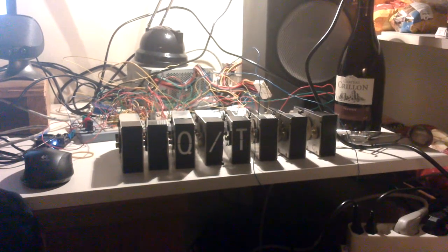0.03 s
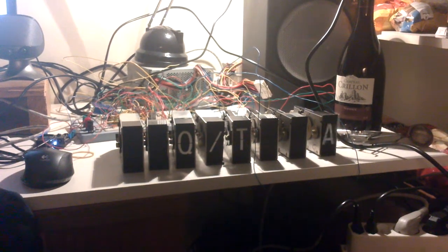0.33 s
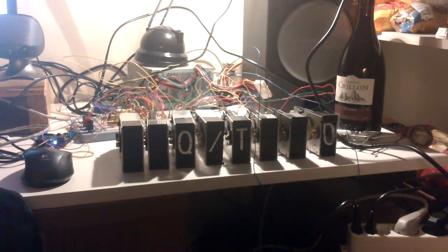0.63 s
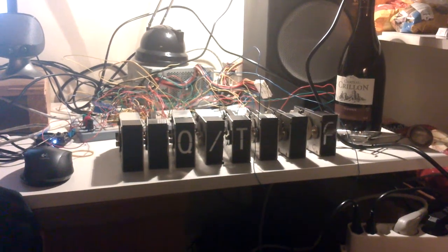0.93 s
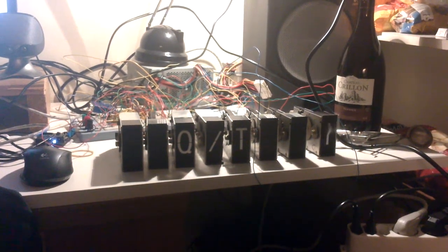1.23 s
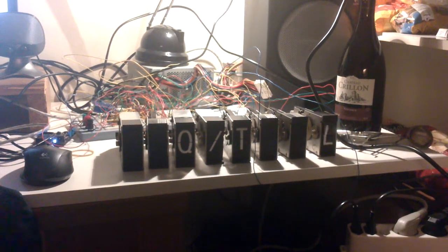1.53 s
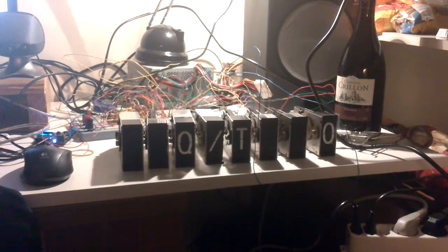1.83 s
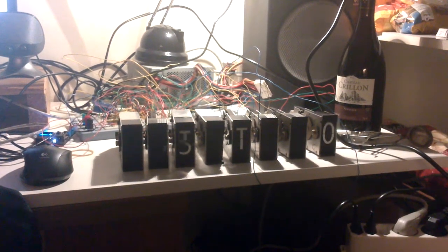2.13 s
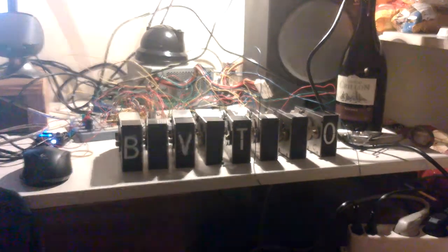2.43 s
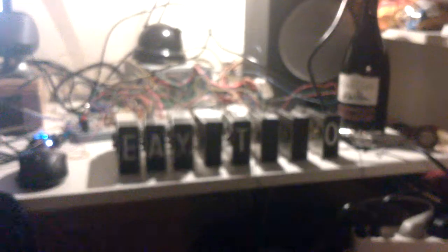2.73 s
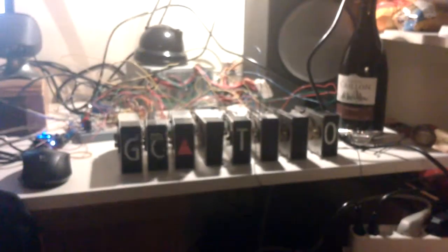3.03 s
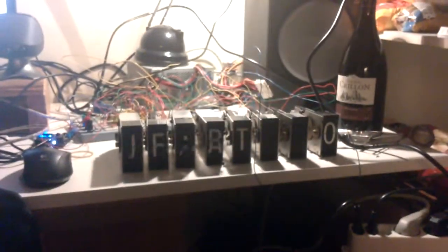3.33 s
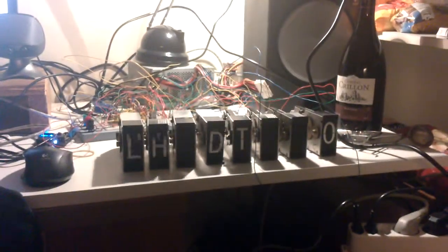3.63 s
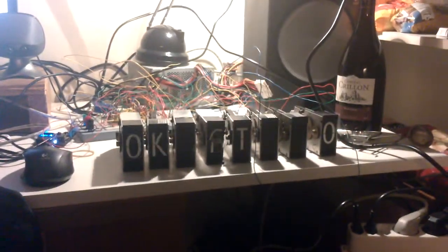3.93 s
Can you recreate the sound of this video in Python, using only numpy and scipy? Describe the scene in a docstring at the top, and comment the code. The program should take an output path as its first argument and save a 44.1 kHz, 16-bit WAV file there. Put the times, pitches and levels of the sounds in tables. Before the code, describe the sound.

Split-flap modules rattle on a desk in a quiet room, close to the microphone. One ticks rapidly alone, then several flip together in a fuller, slightly slower rhythm, with a few flaps snapping against the plastic cases.

```python
"""A desk in a small, quiet room: split-flap modules step through their letters, one alone, then four together.
Each step is a quickening train of frictional ratchet ticks that drives the resonances of the plastic case.
The force grows as the flap bends and dies as it slips free; the flap then patters down with a soft thud.
Now and then a flap catches and slaps. The room reverberates briefly after every step."""
import sys
import numpy as np
from scipy import signal
from scipy.fft import rfft, irfft
from scipy.io import wavfile
from scipy.ndimage import uniform_filter1d

SR = 44100
rng = np.random.default_rng(int(sys.argv[2]) if len(sys.argv) > 2 else 0)


def to_wav(sig):
    """Store sig (one row per channel, or 1-D mono) as 16-bit WAV at the path in sys.argv[1].

    Samples outside -1..1 are clipped; the rate is SR.
    """
    pcm = np.clip(np.atleast_2d(sig), -1, 1) * 32767
    pcm = np.round(pcm).astype(np.int16)
    wavfile.write(sys.argv[1], SR, pcm.T)  # frames by channels


N = 176400

# All levels in the tables are relative.
# spectrum of the room's background noise [f/Hz, level/dB]
BACKGROUND_SPECTRUM = [(12, 14.5), (30, -8), (48, -10.5), (75, -16), (140, -14), (300, -23), (1000, -30),
                       (4000, -45.5), (15000, -41.5)]
# steps of the lone module [t/s, ratchet level/dB, fall level/dB, bent flap's resonance f/Hz]
LONE_STEPS = [(-.058, 3.5, -55, 5800), (.05, -28.5, -59.5, 6050), (.157, -28.5, -53.5, 6080),
              (0.2702, -28, -57, 5640), (0.3762, -28, -58.5, 5600), (0.4854, -27.5, -63, 5850),
              (0.5913, -26.5, -59.5, 5300), (0.6974, -26.5, -62.5, 5220), (0.8052, -27.5, -59, 5350),
              (0.9126, -27, -63, 5380), (1.0215, -28, -61.5, 5580), (1.1337, -28, -55.5, 6000),
              (1.243, -28, -53, 5980), (1.3515, -28.5, -59, 5770), (1.455, -28.5, -57, 5720),
              (1.5612, -26.5, -67, 5600), (1.671, -26.5, -57.5, 5300), (1.7767, -26, -58, 5280)]
# steps of the group [t/s, ratchet level/dB, fall level/dB]
GROUP_STEPS = [(1.871, -27.5, -52.5), (1.99, -26, -51.5), (2.107, -27.5, -51), (2.229, -26, -52.5),
               (2.344, -26, -50.5), (2.463, -25.5, -52), (2.58, -25.5, -51.5), (2.7, -26.5, -52.5),
               (2.816, -26, -54), (2.934, -26.5, -52.5), (3.058, -26.5, -52.5), (3.175, -26.5, -50),
               (3.295, -26.5, -51.5), (3.411, -26.5, -50.5), (3.53, -26, -53), (3.646, -26, -52.5),
               (3.764, -26.5, -51), (3.884, -26, -51.5)]
# slaps of caught flaps [t/s, level/dB]
SLAPS = [(1.944, -35), (1.954, -31), (2.163, -29), (2.629, -35), (2.637, -33.5), (3.469, -31),
         (3.741, -35.5), (3.818, -27), (3.823, -34.5)]
# broad frequency response of the cases [f/Hz, level/dB]
LONE_CASE = [(500, -51.5), (1400, -84), (1850, -28), (2150, -35.5), (2450, -10), (2900, -21.5), (3600, -11),
             (4650, -16), (5050, -2), (6400, -4), (7200, -8), (10000, -4), (12500, -9.5), (14500, -5.5),
             (15700, -5)]
GROUP_CASE = [(400, -39), (1000, -31), (1650, -33), (2100, -11), (2500, -11.5), (2850, -17.5), (3600, -13),
              (4700, -9), (5300, -3.5), (6000, 0.5), (6600, 2.5), (7700, -5.5), (8700, 0), (11000, -6),
              (13000, -7.5), (15000, -5.5)]
# narrow modes of the cases [f/Hz, bandwidth/Hz, level/dB re the broad response]
LONE_MODES = [(1850, 130, 9), (3600, 400, -3), (5330, 60, -11), (5480, 70, -10), (5730, 70, -7),
              (12000, 100, -6), (14500, 90, -5)]
GROUP_MODES = [(6640, 200, -4), (7045, 50, -4), (7345, 40, -2), (8520, 45, -6), (13740, 100, -6),
               (14880, 70, -4), (15290, 50, -6)]
# spectra of the falling flaps [f/Hz, level/dB]
LONE_FALL_SPECTRUM = [(80, -14.5), (135, 5), (200, 0), (290, -2.5), (470, 0.5), (650, -8.5), (880, -3.5),
                      (1350, -18), (1820, -2.5), (2200, -7), (3500, 3), (7000, -3.5)]
GROUP_FALL_SPECTRUM = [(80, -8), (135, -9.5), (200, -0.5), (400, 1), (650, -3), (950, 1), (1600, -3),
                       (2400, 0), (4000, 6), (7000, -12.5)]
# microphone response, left minus right [f/Hz, level/dB]
MIC_BALANCE = [(1000, -0.5), (2500, 1.5), (3400, 0), (4400, -9), (5200, -10.5), (6600, -13), (8400, -8.5),
               (9800, -3.5), (11500, 9), (14000, 10)]
# force on a bending flap [peak t/s, starting level/dB, release rate/(dB/s)]
LONE_BEND = (0.026, -4, 760)
GROUP_BEND = (.023, -6, 560)

STEP_S = .1  # duration of one excitation
STEP_TIME = np.arange(int(STEP_S * SR)) / SR


def undb(db):
    """Amplitude ratio of a level in decibels."""
    return 10 ** (np.asarray(db) / 20)


def unit_energy(x):
    """Normalisation to an energy of 1."""
    return x / np.sqrt(np.sum(x ** 2))


def add(track, at, sound, db):
    """Superposition: mix in a sound with the energy of half a step at an RMS level of db."""
    start = int(at * SR)
    lo, hi = max(start, 0), min(start + len(sound), N)
    if hi > lo:
        track[lo:hi] += (unit_energy(sound) * np.sqrt(STEP_S * SR / 2) * undb(db))[lo - start:hi - start]


def gain_curve(points, size=8192):
    """Magnitude response through (f/Hz, level/dB) points, interpolated in log frequency."""
    hz, db = np.array(points, float).T
    return undb(np.interp(np.log(np.fft.rfftfreq(size, 1 / SR) + 1), np.log(hz), db))


def minimum_phase(gain):
    """Folding the cepstrum gives the most compact causal impulse response with these gains."""
    cepstrum = irfft(np.log(gain))
    half = len(cepstrum) // 2
    cepstrum[1:half] *= 2
    cepstrum[half + 1:] = 0
    return irfft(np.exp(rfft(cepstrum)))[:half]


def crossover(x, hz):
    """Power-complementary filtering: the parts below and above a frequency."""
    ratio = (np.fft.rfftfreq(x.shape[-1], 1 / SR) / hz) ** 2
    low = rfft(x) / np.hypot(1, ratio)
    return irfft(low, x.shape[-1]), irfft(low * ratio, x.shape[-1])


def whiten(response, bins=120):
    """Spectral whitening: the broad colour goes flat, the fine interference ripple stays."""
    power = uniform_filter1d(np.abs(rfft(response)) ** 2, bins)
    return signal.fftconvolve(response, minimum_phase(1 / np.sqrt(power)))[:len(response)]


def resonator(spectrum, modes=(), size=8192):
    """Modal superposition: impulse response of a broad spectrum with damped resonances on top."""
    f = np.fft.rfftfreq(size, 1 / SR)
    peaks = sum(undb(db) / (1 + 2j * (f - hz) / width) for hz, width, db in modes)
    return minimum_phase(gain_curve(spectrum) * np.abs(1 + peaks))


def background(db=-56, side_db=-4):
    """Stationary noise: the room's faint rumble and hiss, partly coherent between left and right."""
    colour = unit_energy(resonator(BACKGROUND_SPECTRUM))
    mid, side = (signal.fftconvolve(rng.standard_normal(N), colour)[:N] for _ in range(2))
    return undb(db) * (mid + undb(side_db) * side * np.array([[1], [-1]]))


def room(x, tail_db=-1, desk_db=5):
    """Reverberation: direct sound, early reflections off the cluttered desk and an exponential tail."""
    desk_t60_s, tail_t60_s, treble_t60_s = .011, .18, .17
    tail_delay_s, bass_hz, treble_hz = .0062, 844, 7560
    t = np.arange(SR // 2) / SR

    def diffuse_field(t60_s):
        """Decaying noise in which only the long waves are alike at both sides."""
        coherent = rng.standard_normal(len(t)) + undb(-5) * rng.standard_normal((2, len(t)))
        bass, _ = crossover(coherent, bass_hz)
        _, upper = crossover(rng.standard_normal((2, len(t))), bass_hz)
        return (bass + upper) * np.exp(-np.log(1000) * t / t60_s)

    desks = diffuse_field(desk_t60_s)
    low_tails, _ = crossover(diffuse_field(tail_t60_s), treble_hz)
    _, high_tails = crossover(diffuse_field(treble_t60_s), treble_hz)
    tails = (low_tails + high_tails) * (t > tail_delay_s) * (t < .49)  # the window ends in silence
    responses = [(t == 0) + undb(desk_db) * unit_energy(desk) + undb(tail_db) * unit_energy(tail)
                 for desk, tail in zip(desks, tails)]
    return np.array([signal.oaconvolve(x, whiten(response))[:N] for response in responses])


def falling_flaps(steps, spectrum, gain_db):
    """Impact noise: each freed flap patters onto the stack and the desk answers with a soft thud."""
    peak_s, rise_s, decay_s, grit = .048, .008, .02, .6
    thud_hz, thud_lag_s = 277, .01193
    out, ring, t = np.zeros(N), resonator(spectrum), STEP_TIME
    swell = np.where(t < peak_s, np.exp((t - peak_s) / rise_s), np.exp((peak_s - t) / decay_s))
    for at, _, fall_db, *_ in steps:
        noise = rng.standard_normal(len(t))
        roughness = np.exp(grit * np.clip(rng.standard_normal(len(t)), -2, 2))
        add(out, at, signal.fftconvolve(swell * noise * roughness, ring), fall_db + gain_db)
    thud, patter = crossover(out, thud_hz)
    return patter + np.roll(thud, int(thud_lag_s * SR))


def slaps(decay_s=.0018, gain_db=-4.5):
    """Impulsive excitation: a caught flap snaps against the case, which rings freely."""
    out, case = np.zeros(N), resonator(GROUP_CASE, GROUP_MODES)
    for at, db in SLAPS:
        impact = rng.standard_normal(len(STEP_TIME)) * np.exp(-STEP_TIME / decay_s)
        add(out, at, signal.fftconvolve(impact, case), db + gain_db)
    return out


def ratchet(bend, ticks=20):
    """Friction: scraping ticks come ever faster, swell as the flap bends and die once it slips free."""
    first_gap_s, last_gap_s, speedup_ticks, gap_scatter = .0064, .0014, 2.292, .063
    scrape_s, tick_scatter_db, rub_db, grit = .0019, 1.6, -15, .3
    peak_s, start_db, release_db_per_s = bend
    t = STEP_TIME
    gap_jitter, level_jitter = rng.standard_normal((2, ticks))
    gaps = last_gap_s + (first_gap_s - last_gap_s) * np.exp(-np.arange(ticks) / speedup_ticks)
    gaps *= np.exp(gap_scatter * gap_jitter)
    contact = np.full(len(t), undb(rub_db))  # steady rubbing under the ticks
    for at, gain in zip(np.cumsum(gaps) - gaps, undb(tick_scatter_db * level_jitter)):
        age = np.maximum(t - at, 0) / scrape_s
        contact += 2 * gain * np.sqrt(age) * np.exp(-age ** 2)
    force_db = np.where(t < peak_s, start_db * (1 - t / peak_s), -release_db_per_s * (t - peak_s))
    friction = rng.standard_normal(len(t)) * np.exp(grit * rng.standard_normal(len(t)))
    return contact * undb(force_db) * friction


def lone_module(gain_db=-1, flap_width_hz=350, flap_db=6.5):
    """Forced vibration: the ratchet drives the case, and each bent flap adds a resonance of its own."""
    out = np.zeros(N)
    for at, db, _, flap_hz in LONE_STEPS:
        case = resonator(LONE_CASE, LONE_MODES + [(flap_hz, flap_width_hz, flap_db)])
        add(out, at, signal.fftconvolve(ratchet(LONE_BEND), case), db + gain_db)
    return room(out)


def module_group(count=4, stagger_s=.003, gain_db=2.5):
    """Incoherent addition: modules step almost together, each with the reflections of its own place."""
    out, case = 0, resonator(GROUP_CASE, GROUP_MODES)
    for place in range(count):
        module = np.zeros(N)
        for at, db, _ in GROUP_STEPS:
            lag = stagger_s * place / (count - 1) * rng.uniform(.5, 1.5)
            add(module, at + lag, signal.fftconvolve(ratchet(GROUP_BEND), case), db + gain_db)
        out = out + room(module)
    return out / np.sqrt(count)


def scene():
    """Linear superposition of the modules, their flaps and the room's background, in stereo."""
    falls = falling_flaps(LONE_STEPS, LONE_FALL_SPECTRUM, gain_db=10.5)
    falls += falling_flaps(GROUP_STEPS, GROUP_FALL_SPECTRUM, gain_db=7.5)
    modules = lone_module() + module_group()
    return modules + room(slaps()) + room(falls, tail_db=-1.5, desk_db=-20) + background()


def record(dry, gain_db=-2, cutoff_hz=15650):
    """Microphone response: the right favours 4-10 kHz, the left the treble above; both are low-passed."""
    tilt = np.sqrt(gain_curve(MIC_BALANCE))
    heard = np.array([signal.fftconvolve(x, minimum_phase(gain))[:N]
                      for x, gain in zip(dry, (tilt, 1 / tilt))])
    lowpass = signal.ellip(10, .2, 70, cutoff_hz, fs=SR, output="sos")
    return signal.sosfilt(lowpass, heard * undb(gain_db))


dry = scene()
out = record(dry)
to_wav(out)
```